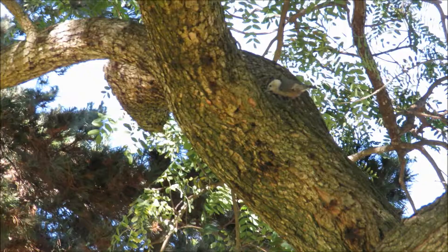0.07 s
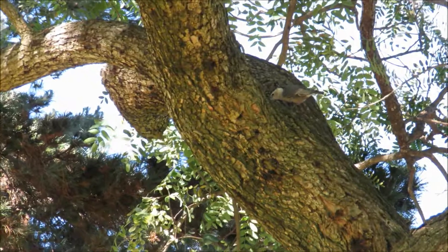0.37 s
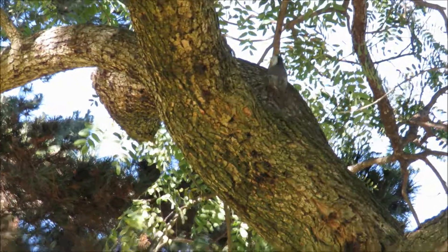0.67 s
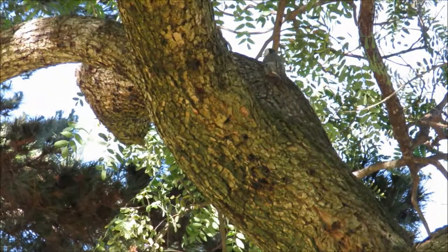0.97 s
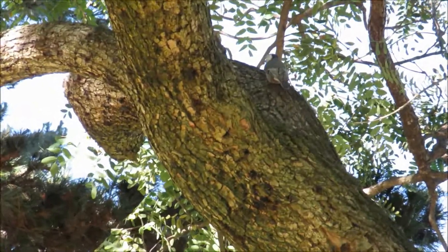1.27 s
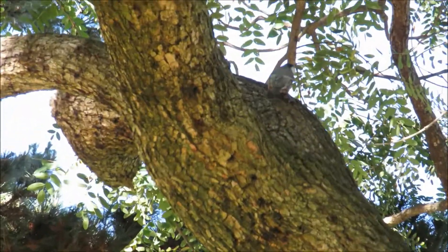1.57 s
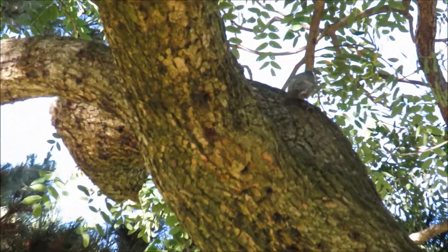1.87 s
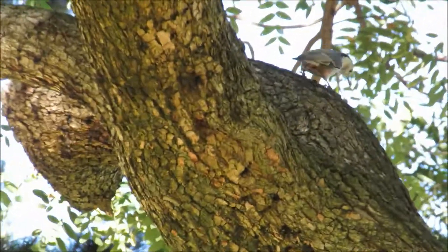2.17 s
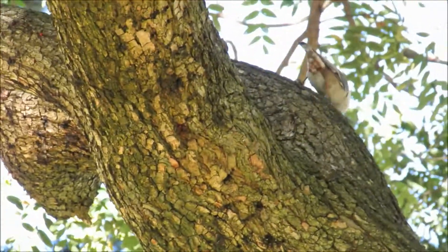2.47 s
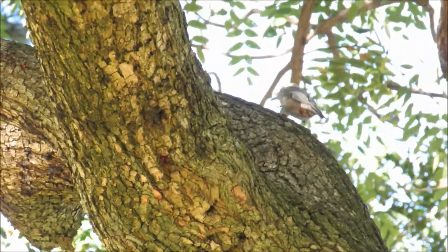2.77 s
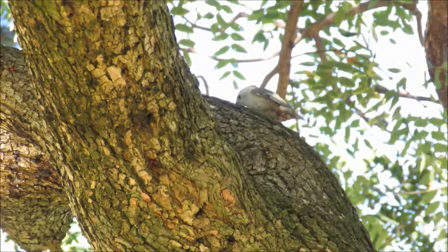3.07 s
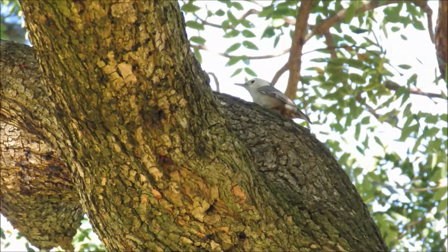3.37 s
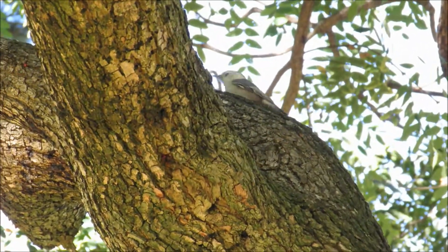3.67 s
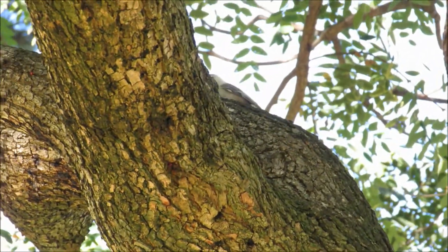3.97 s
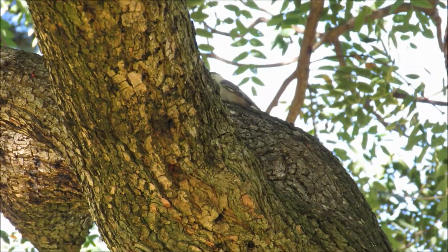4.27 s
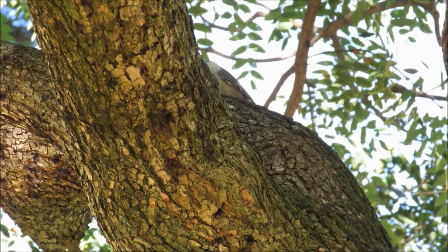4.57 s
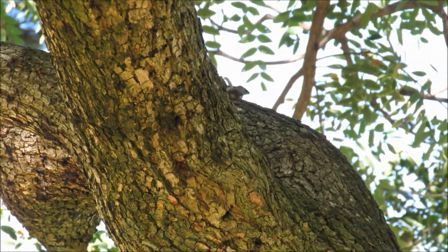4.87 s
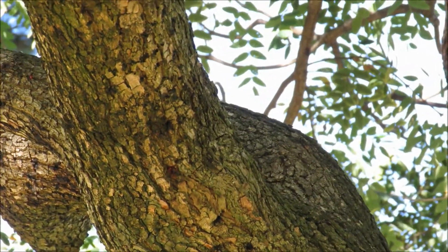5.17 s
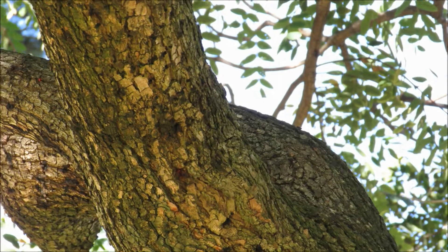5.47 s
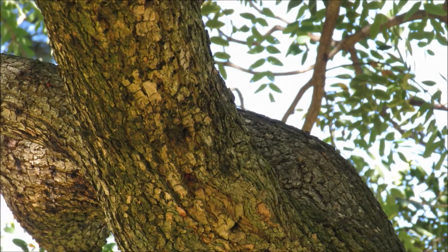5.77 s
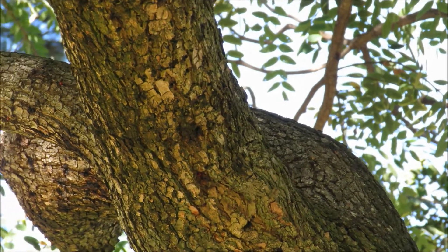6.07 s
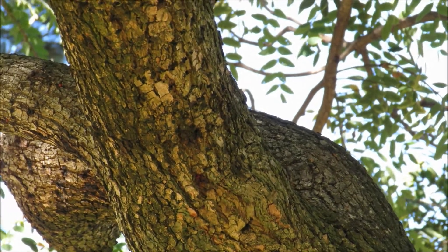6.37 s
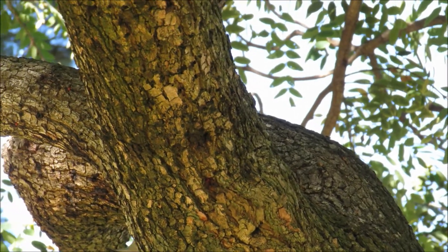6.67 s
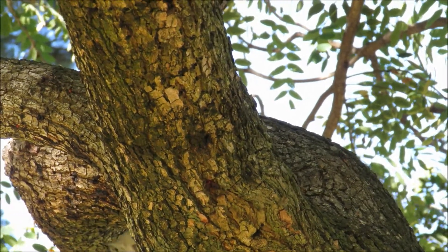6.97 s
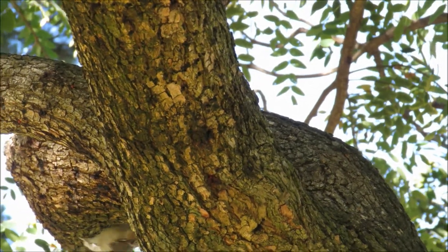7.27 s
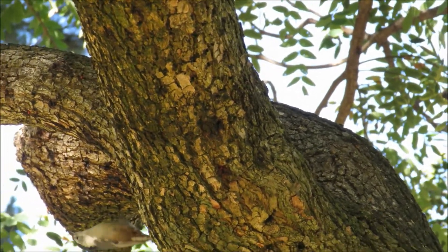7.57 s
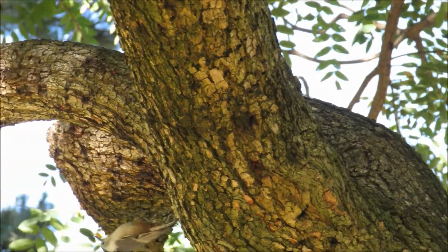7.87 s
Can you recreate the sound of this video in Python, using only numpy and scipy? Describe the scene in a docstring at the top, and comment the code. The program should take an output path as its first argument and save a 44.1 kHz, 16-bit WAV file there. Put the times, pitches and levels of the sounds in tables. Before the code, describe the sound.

Sparse high bird chips and light bark taps end in a short nasal rattle, with faint far birds and low rumble behind.

```python
"""Among trees, far from a road. A nuthatch forages on a limb: short two-voiced chips from both sides
of its syrinx, taps on the bark, then a nasal note that breaks into a rattle. The canopy scatters each
call. Other birds whistle faintly far off. Traffic rumbles under a wide hiss. Low swells and bumps reach
the microphone, from handling early on and from breeze. Everything fades in over the first seconds."""
import sys
import numpy as np
from scipy import signal
from scipy.fft import rfft, irfft, next_fast_len
from scipy.io import wavfile
from scipy.ndimage import map_coordinates

SR = 44100
rng = np.random.default_rng(int(sys.argv[2]) if len(sys.argv) > 2 else 0)


def log_audio(samples):
    """Write samples as a 16-bit WAV file to the path given in sys.argv[1]."""
    # one column per channel
    frames = np.atleast_2d(samples).T
    # limit to full scale, then quantise
    limited = np.clip(frames, -1, 1)
    pcm = np.round(limited * 32767).astype(np.int16)
    wavfile.write(sys.argv[1], SR, pcm)


N = 354563
T = np.arange(N) / SR

# hiss common to both channels: (frequency [Hz], density [dB])
HISS_MID_SPECTRUM = [(300, -7), (2500, -5), (5000, 0), (8000, 1.5), (15500, -0.5)]
# hiss opposed between channels: (frequency [Hz], density [dB])
HISS_SIDE_SPECTRUM = [(100, -8), (330, 9), (700, 6), (2800, -3), (6000, 0), (15500, 1)]
# far road: (frequency [Hz], density [dB])
ROAD_SPECTRUM = [(100, -9.5), (200, -1.5), (330, -2.5), (500, 1.5), (700, -4.5), (950, -7.5), (1400, -17.5),
                 (2000, -19.5), (2700, -27), (3500, -23), (5000, -29.5), (9000, -33.5)]
# far engine: (frequency [Hz], level [dB])
ENGINE_PARTIALS = [(81, -39.5), (123, -39.5), (155, -44.5), (249, -53)]
# low rumble on the microphone: (frequency [Hz], density [dB])
RUMBLE_SPECTRUM = [(12, -39), (24, -9), (38, 4.5), (59, 4), (91, -0.5), (123, -4), (178, -14), (260, -20.5),
                   (500, -69)]
# swells of the rumble: (crest [s], half length [s], level [dB])
RUMBLE_SWELLS = [(0.383, 0.023, -16.5), (0.673, 0.072, -23), (0.896, .05, -19.5), (1.092, 0.11, -19),
                 (1.28, 0.08, -19), (1.998, 0.25, -20), (2.846, .06, -22), (3.104, 0.08, -23.5),
                 (3.91, 0.54, -26.5), (4.524, 0.038, -20), (5.3, 0.88, -33), (5.986, 0.16, -21),
                 (6.605, 0.49, -31)]
# heavy bumps: (time [s], frequency [Hz], level [dB])
RUMBLE_BUMPS = [(1.118, 80, -9), (1.302, 79.5, -12), (1.522, 73, -9), (1.688, 81.4, -14), (3.039, 85, -5),
                (5.866, 70.4, -13), (5.969, 77, -9.5), (6.001, 65, -14), (6.072, 50.5, -13)]
# far slurs: (start [s], length [s], start pitch [Hz], end pitch [Hz], level [dB])
FAR_WHISTLES = [(0.886, 0.056, 3300, 3650, -42), (1.628, .05, 3650, 3150, -45),
                (1.855, 0.035, 3900, 3520, -43.5), (3.182, .06, 2880, 2980, -50),
                (3.216, .048, 3050, 4100, -49), (5.047, 0.094, 3050, 4040, -55.5),
                (5.14, 0.056, 2400, 3050, -50), (5.747, 0.072, 2350, 3480, -47.5),
                (6.057, .031, 3050, 4220, -41)]
# far trills: (start [s], length [s], pitch [Hz], level [dB])
FAR_TRILLS = [(1.349, 0.22, 3420, -45), (1.971, 0.402, 3350, -44)]
# hollow under the bark: (frequency [Hz], bandwidth [Hz], level [dB])
HOLLOW_MODES = [(1320, 65, 6), (1635, 53, 4), (1805, 57, 3.5)]
# snapping flake: (frequency [Hz], bandwidth [Hz], level [dB])
FLAKE_MODES = [(2460, 1100, 3), (3150, 390, 0.5), (3790, 480, 10), (4820, 400, -33)]
# taps on the bark: (time [s], level [dB], knock gain [dB])
BARK_TAPS = [(.341, -18.5, -16), (.545, -24.5, 9), (1.06, -23.5, 7), (1.482, -21, -16), (1.696, -25, 8),
             (1.828, -30.5, -12), (2.505, -24.5, 9), (6.712, -23.5, -24), (7.148, -23.5, -9)]
# one chip: (position [0-1], lower voice [Hz], lower level [dB], upper voice [Hz], upper level [dB])
CHIP_CONTOUR = [(0, 2850, -19, 4650, -17), (.14, 3150, -5, 5300, -18), (.32, 4250, -10, 6000, -7.5),
                (.46, 4900, -9, 6450, -8), (.6, 5360, -4, 6900, -18), (.76, 6080, -8, 7450, -17),
                (.87, 5140, -12, 7350, -22), (1, 3500, -11, 6800, -45)]
# chips: (start [s], length [s], level [dB], upper voice gain [dB], lower voice tilt [dB/kHz],
# silent lead [0-1], echo gain [dB])
CHIP_CALLS = [(0.69, 0.037, -44.5, 3, -2, 0.11, 9.5), (1.19, 0.026, -47.5, -2, -4.5, 0.13, 2),
              (2.496, 0.026, -43, -1, -0.5, 0.13, 6), (2.685, 0.024, -22.5, -6, 6, 0, -7.5),
              (3.318, 0.037, -37.5, -1, -0.5, 0.17, 0), (4.408, 0.024, -46, -8, -7, 0.32, 4.5),
              (5.346, 0.027, -20.5, -3, 6, 0.025, -9.5), (5.688, .031, -23.5, -14, -2, 0.2, -10),
              (5.74, 0.025, -48, 14, 1, 0.18, 2), (6.646, .030, -22, 0, 4.5, 0, -6.5),
              (7.138, 0.032, -18.5, -4.5, 5.5, 0.024, -8.5)]
# throat and bill: (frequency [Hz], gain [dB])
THROAT_RESPONSE = [(1100, -26.5), (1450, -11.5), (2100, -17), (2800, -10.5), (3300, 0), (3550, -4),
                   (4000, -10.5), (4480, -17), (5550, -34), (6600, -39), (10000, -58)]
# rattle: (crest [s], rise [s], crest pitch [Hz], level [dB])
RATTLE_SYLLABLES = [(7.657, 0.0094, 1363, -27.5), (7.677, 0.0095, 1395, -26), (7.702, 0.007, 1420, -27),
                    (7.727, .008, 1400, -26.5), (7.750, 0.0092, 1376, -28), (7.799, 0.0053, 1168, -28),
                    (7.864, 0.0036, 1186, -29.5), (7.958, .0033, 1304, -27), (7.979, 0.009, 1076, -30.5)]


def amp(db):
    """Decibels to gain."""
    return 10 ** (np.asarray(db) / 20)


def unit_rms(x):
    """Scale to rms 1."""
    return x / np.sqrt(np.mean(x ** 2) + 1e-20)


def gain_at(spectrum, hz):
    """Gain from (frequency [Hz], level [dB]) points on a log axis."""
    points_hz, points_db = np.transpose(spectrum)
    return amp(np.interp(np.log(hz + 1), np.log(points_hz + 1), points_db))


def curves(rows, at):
    """Later columns, interpolated along the first."""
    position, *columns = np.transpose(rows)
    return [np.interp(at, position, column) for column in columns]


def wobble(knots_per_s, size=N):
    """Smooth random curve."""
    knots = rng.standard_normal(int(size * knots_per_s / SR) + 4)
    return map_coordinates(knots, [np.arange(size) * knots_per_s / SR])


def filtered(x, response):
    """Apply a gain given as a function of frequency."""
    size = next_fast_len(N + SR // 2)
    return irfft(rfft(x, size) * response(np.fft.rfftfreq(size, 1 / SR)), size)[..., :N]


def noise(spectrum):
    """Shaped noise, rms 1."""
    return unit_rms(filtered(rng.standard_normal(N), lambda hz: gain_at(spectrum, hz)))


def tone(hz):
    """Sine on a pitch curve, rms 1."""
    return np.sqrt(2) * np.sin(2 * np.pi * (np.cumsum(hz) / SR + rng.random()))


def gate(size, edge_s):
    """Window with soft edges."""
    t = np.arange(size) / SR
    return np.sin(np.pi / 2 * np.clip(np.minimum(t, t[::-1]) / edge_s, 0, 1)) ** 2


def add(track, start_s, sound):
    """Mix a sound into a track."""
    rest = track[max(round(start_s * SR), 0):]
    rest[:len(sound)] += sound[:len(rest)]


def canopy(x, near_t60_s, far_t60_s, far_db):
    """Quick echo off near limbs, weak long echo off farther trees."""
    t = np.arange(SR // 2) / SR
    decay = amp(-60 * t / near_t60_s) + amp(far_db - 60 * t / far_t60_s)
    tail = rng.standard_normal(len(t)) * decay * gate(len(t), edge_s=0.006)
    return signal.fftconvolve(x, tail / np.linalg.norm(tail))[:N]


def hiss(level_db=-51, side_db=-4.5):
    """Steady hiss, the only stereo layer."""
    mid = noise(HISS_MID_SPECTRUM)
    side = amp(side_db) * noise(HISS_SIDE_SPECTRUM)
    return amp(level_db) * np.array([mid + side, mid - side])


def traffic(road_db=-36, exhaust_db=-45, engine_gain_db=-0.5, nearing_db_per_s=0.1256):
    """Far road wash, plus drone and exhaust of a slowly nearing engine."""
    wash = amp(road_db + 0.75 * wobble(9)) * noise(ROAD_SPECTRUM)
    drone = sum(amp(db + 1.15 * wobble(2.6)) * tone(hz * (1 + 0.0117 * wobble(5)))
                for hz, db in ENGINE_PARTIALS)
    exhaust_spectrum = [(100, -17), (200, 1), (290, -2.5), (600, -41), (2000, -70)]
    exhaust = amp(exhaust_db + 1.3 * wobble(3)) * noise(exhaust_spectrum)
    return wash + amp(engine_gain_db + nearing_db_per_s * T) * (drone + exhaust)


def microphone_rumble(floor_db=-31.5, flutter_db=2.04):
    """Low swells and bumps, from handling early on and from breeze."""
    swell_power = sum(amp(db) ** 2 * np.exp(-2 * ((T - crest_s) / half_s) ** 2)
                      for crest_s, half_s, db in RUMBLE_SWELLS)
    strength = np.sqrt(amp(floor_db) ** 2 + swell_power)
    out = strength * amp(flutter_db * wobble(9)) * noise(RUMBLE_SPECTRUM)
    for time_s, hz, db in RUMBLE_BUMPS:
        cycles = np.arange(-2, 2, hz / SR)
        push = -cycles * np.exp(-(np.pi * cycles) ** 2)  # pressure rises, then swings under
        add(out, time_s - 2 / hz, amp(db) * push / push.max())
    return out


def far_birds(trill_rate_hz=24, swell_db_per_s=14,
              strays_per_s=2.7, stray_s=0.061, stray_hz=3400, spread_hz=347, stray_db=-60):
    """Slurs, fainter random strays and swelling trills from other trees; mostly echo."""
    slurs, trills, strays = np.zeros(N), np.zeros(N), []
    for draw in rng.random((int(strays_per_s * N / SR), 3)):
        from_hz, to_hz = stray_hz + spread_hz * (2 * draw[1:] - 1)
        strays.append((draw[0] * N / SR, stray_s, from_hz, to_hz, stray_db))
    for start_s, length_s, from_hz, to_hz, db in FAR_WHISTLES + strays:
        size = int(length_s * SR)
        pitch_hz = np.linspace(from_hz, to_hz, size) * (1 + 0.036 * wobble(1200, size))
        add(slurs, start_s, amp(db) * tone(pitch_hz) * gate(size, edge_s=length_s / 4))
    for start_s, length_s, hz, db in FAR_TRILLS:
        t = np.arange(int(length_s * SR)) / SR
        cycle = t * trill_rate_hz % 1
        pitch_hz = hz * (1 + 0.08 * (0.5 - cycle) + 0.115 * wobble(3000, len(t)))
        swell_db = swell_db_per_s * (t - length_s / 2)
        pulses = np.sqrt(np.sin(np.pi * cycle)) * gate(len(t), edge_s=0.014)
        add(trills, start_s, amp(db + swell_db) * tone(pitch_hz) * pulses)
    echo = canopy(slurs + trills, near_t60_s=0.083, far_t60_s=0.67, far_db=-20)
    return amp(-6) * slurs + amp(-3.5) * echo


def ring(modes, t):
    """Damped modes; levels vary per strike."""
    return sum(amp(db + rng.normal(0, 0.99)) * np.exp(-np.pi * width_hz * t) * np.sin(2 * np.pi * hz * t)
               for hz, width_hz, db in modes)


def taps(crumble_t60_s=0.014, knock_trim_db=-2, cutoff_hz=5800, echo_db=-10.5):
    """Bill and claws snap bark flakes and knock on the hollow beneath."""
    out, t = np.zeros(N), np.arange(SR // 16) / SR
    for time_s, db, knock_db in BARK_TAPS:
        crumble = rng.standard_normal(len(t)) * amp(-60 * t / crumble_t60_s)
        snap = unit_rms(signal.fftconvolve(crumble, ring(FLAKE_MODES, t))[:len(t)])
        knock = amp(knock_db + knock_trim_db) * unit_rms(ring(HOLLOW_MODES, t))
        tap = snap + knock
        add(out, time_s, amp(db) * tap / np.abs(tap).max())
    out = filtered(out, lambda hz: 1 / (1 + (hz / cutoff_hz) ** 8))  # soft bark gives little treble
    return out + amp(echo_db) * canopy(out, near_t60_s=0.12, far_t60_s=0.43, far_db=-16)


def off_limb(sound, mean_delay_s=0.0007, limb_db=-12):
    """Voice plus its reflection off the perch, which notches the sweep."""
    lag = int(mean_delay_s * SR * (0.5 + rng.random()))
    reflection = amp(limb_db) * np.pad(sound, (lag, 0))[:len(sound)]
    return (sound + reflection) / np.hypot(1, amp(limb_db))


def chips(jitter=0.014, overtone_db=-23, rasp_db=-25, rasp_hz=7900):
    """Both sides of the syrinx sweep up, then the lower voice flicks down."""
    direct, scattered = np.zeros(N), np.zeros(N)
    for start_s, length_s, db, upper_gain_db, tilt_db_per_khz, silent_lead, echo_db in CHIP_CALLS:
        size = int(length_s * SR)
        progress = np.linspace(0, 1, size)
        lower_hz, lower_db, upper_hz, upper_db = curves(CHIP_CONTOUR, progress)
        tilt_db = tilt_db_per_khz * (lower_hz - 5400) / 1000
        fundamental = tone(lower_hz * (1 + jitter * wobble(490, size)))
        overtone = amp(overtone_db + 20 * (0.4162 - progress)) * tone(2 * lower_hz)
        lower = amp(lower_db + tilt_db) * (fundamental + overtone)
        upper = amp(upper_db + upper_gain_db) * tone(upper_hz * (1 + jitter * wobble(490, size)))
        rasp = amp(rasp_db + upper_db) * wobble(2500, size) * tone(np.full(size, rasp_hz))
        envelope = np.clip((progress - silent_lead) / 0.052, 0, 1) * gate(size, edge_s=0.00032)
        chip = amp(db + 0.45 * wobble(530, size)) * (lower + upper + rasp) * envelope
        add(direct, start_s, off_limb(chip))
        add(scattered, start_s, amp(echo_db) * chip)
    return direct + canopy(scattered, near_t60_s=0.12, far_t60_s=0.76, far_db=-19)


def nasal_voice(pitch_hz, jitter, harmonics=8):
    """Harmonics shaped by throat resonances; unsteady cycles add rasp."""
    size = len(pitch_hz)
    pitch_hz = pitch_hz * (1 + jitter * wobble(900, size))
    stack = np.zeros(size)
    for k in range(1, harmonics + 1):
        harmonic = gain_at(THROAT_RESPONSE, k * pitch_hz) * tone(k * pitch_hz)
        stack += harmonic * (1 + 17 * jitter * wobble(1500, size))
    return stack * gate(size, edge_s=0.0005)


def quavering_note(start_s=7.496, length_s=0.148, start_hz=1122, sag_hz=185.5,
                   level_db=-18, attack_s=0.036, hold_s=0.031, fade_db_per_s=132,
                   crest_s=7.518, quaver_hz=63.5, slowing_hz_per_s=190, depths=(0.015, 0.067)):
    """Sagging nasal note; its quaver slows, deepens and turns raspy."""
    out, t = np.zeros(N), np.arange(int(length_s * SR)) / SR
    progress = t / length_s
    pitch_hz = start_hz - sag_hz * progress ** 2
    depth = depths[0] + (depths[1] - depths[0]) * progress ** 1.4
    age_s = start_s + t - crest_s
    quaver = depth * np.cos(2 * np.pi * (quaver_hz * age_s - slowing_hz_per_s * age_s ** 2 / 2))
    voice = nasal_voice(pitch_hz * (1 + quaver), jitter=0.37 * np.maximum(depth - 0.012, 0))
    attack = np.minimum(t / attack_s, 1)
    db = level_db - fade_db_per_s * np.maximum(t - attack_s - hold_s, 0)
    add(out, start_s, attack * amp(db + 75 * quaver) * voice)  # pitch crests are louder
    return out


def rattle(fall_s=0.0135, rise_sag=0.2, fall_sag=0.308, taper_db=6):
    """Separate raspy syllables, each arching in pitch and level."""
    out = np.zeros(N)
    for crest_s, rise_s, crest_hz, db in RATTLE_SYLLABLES:
        t = np.arange(-rise_s, fall_s, 1 / SR)
        off_crest = np.where(t < 0, t / rise_s, t / fall_s) ** 2
        sag = np.where(t < 0, rise_sag * (t / 0.0079) ** 2, fall_sag * off_crest ** 0.86)
        voice = nasal_voice(crest_hz * (1 - sag), jitter=0.014)
        flicker_db = 2 * wobble(800, len(t))
        add(out, crest_s - rise_s, amp(db + flicker_db - taper_db * off_crest) * voice)
    return out


def scold(echo_db=-12):
    """Note, then rattle; tree echo fills the gaps between harmonics and syllables."""
    call = quavering_note() + rattle()
    return call + amp(echo_db) * canopy(call, near_t60_s=0.12, far_t60_s=0.8, far_db=-14)


def scene():
    """Rumble and birds centred inside the hiss."""
    return hiss() + traffic() + microphone_rumble() + far_birds() + taps() + chips() + scold()


def record(dry, fade_start_s=0.19, fade_full_s=3.8, band_limit_hz=15800):
    """Linear fade-in, then a sharp low-pass."""
    fade = np.clip((T - fade_start_s) / (fade_full_s - fade_start_s), 0, 1)
    return filtered(fade * dry, lambda hz: hz < band_limit_hz)


dry = scene()
out = record(dry)
log_audio(out)
```